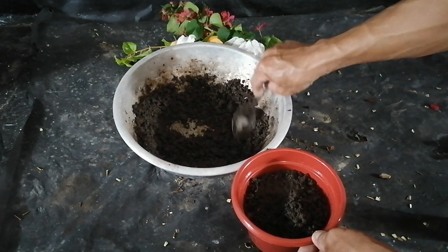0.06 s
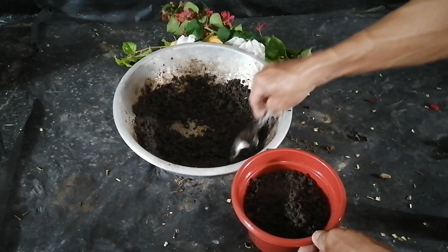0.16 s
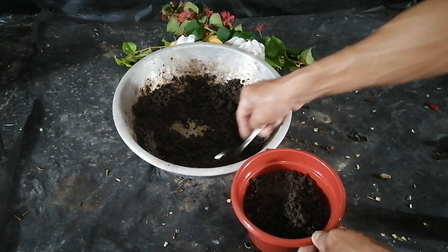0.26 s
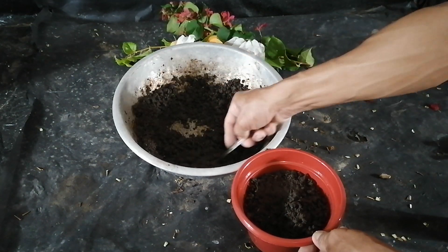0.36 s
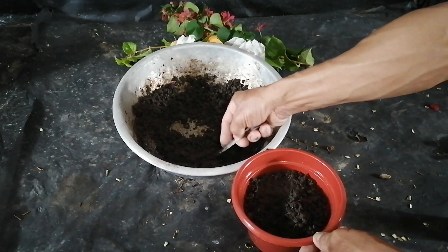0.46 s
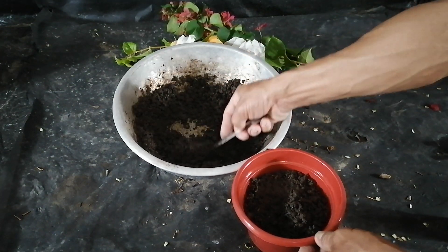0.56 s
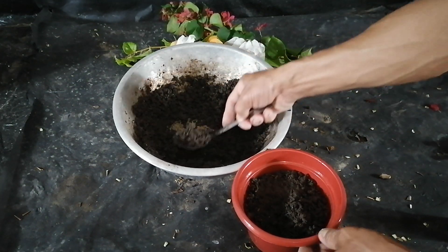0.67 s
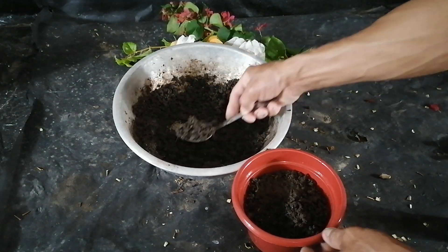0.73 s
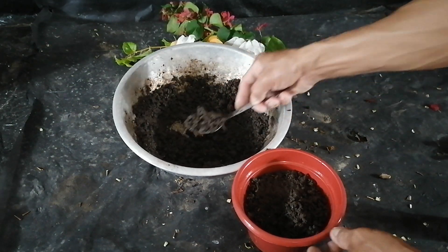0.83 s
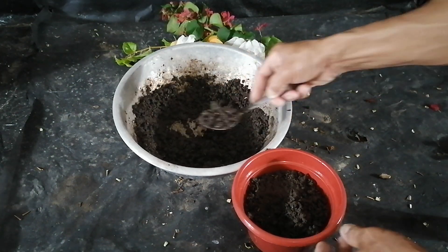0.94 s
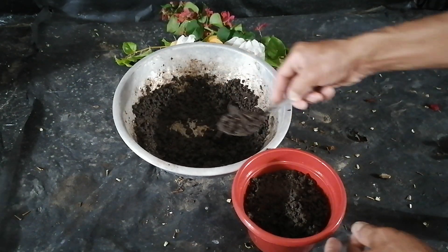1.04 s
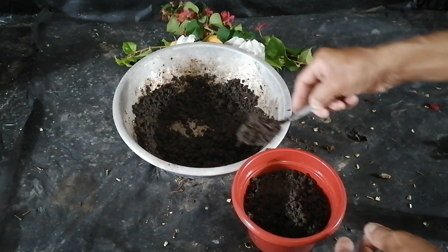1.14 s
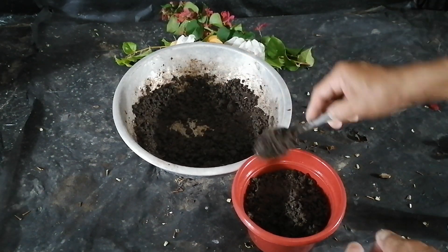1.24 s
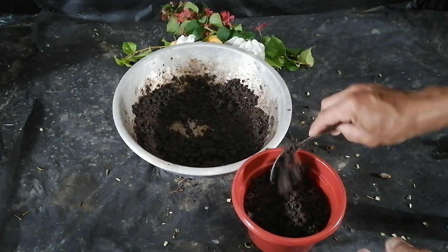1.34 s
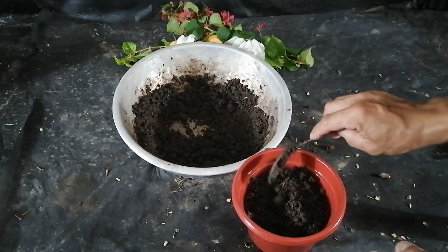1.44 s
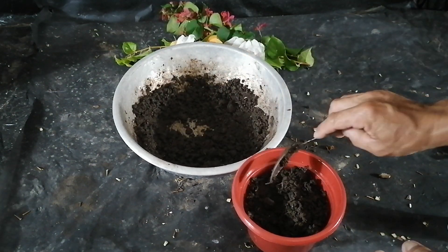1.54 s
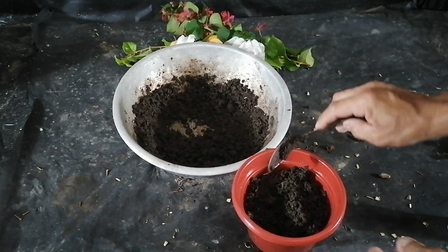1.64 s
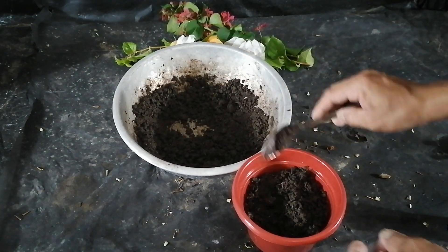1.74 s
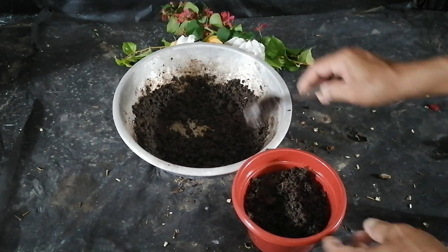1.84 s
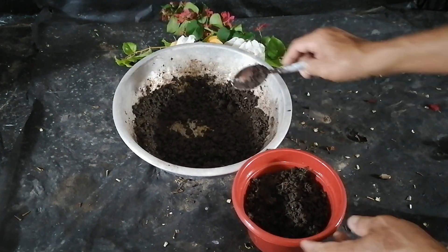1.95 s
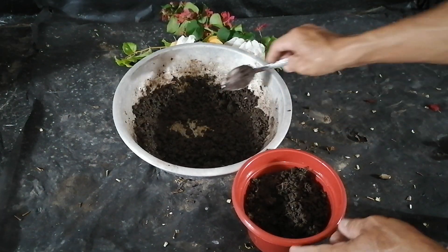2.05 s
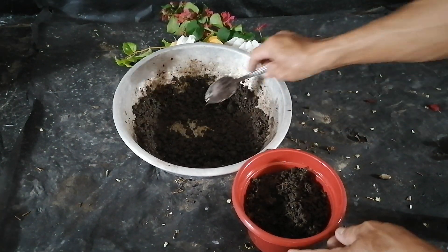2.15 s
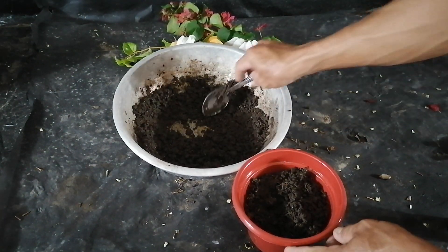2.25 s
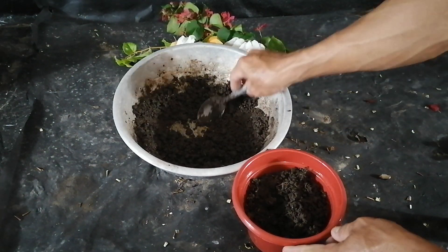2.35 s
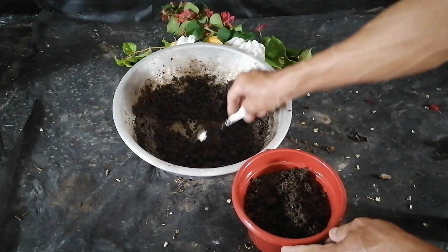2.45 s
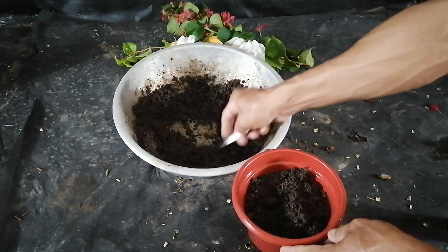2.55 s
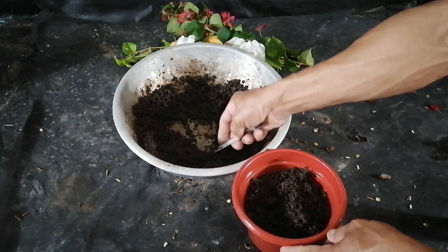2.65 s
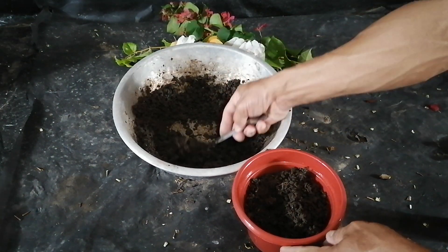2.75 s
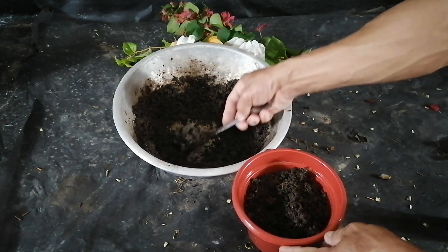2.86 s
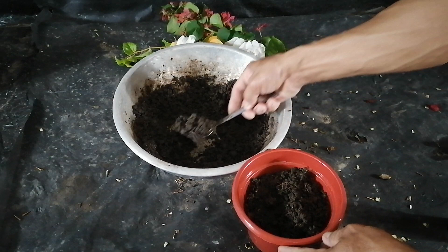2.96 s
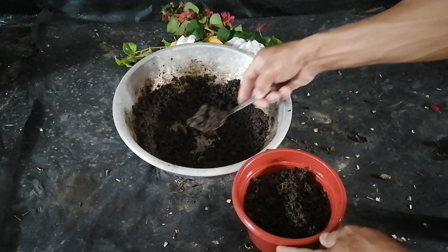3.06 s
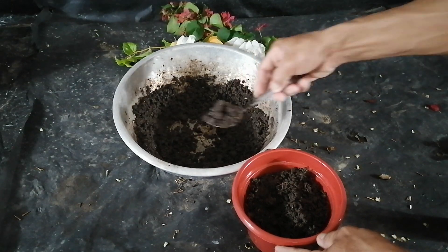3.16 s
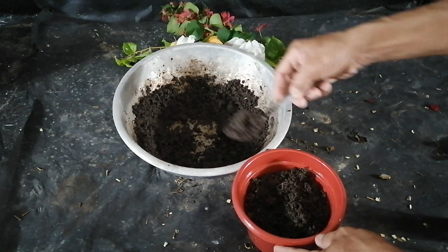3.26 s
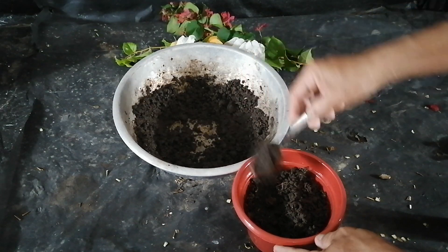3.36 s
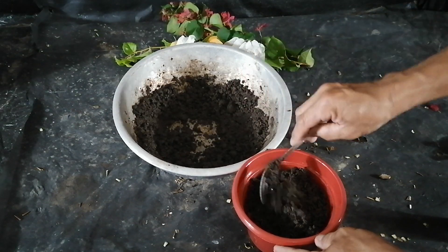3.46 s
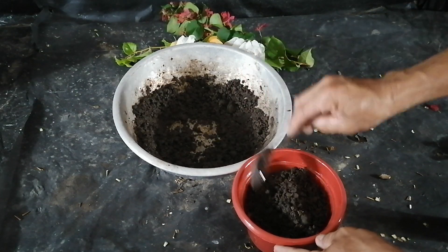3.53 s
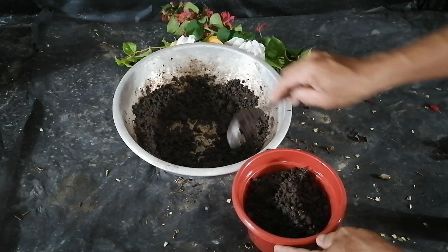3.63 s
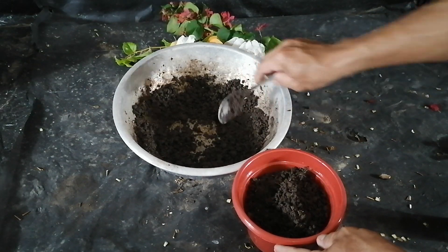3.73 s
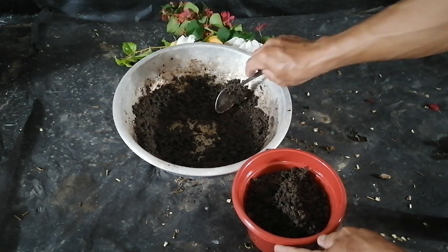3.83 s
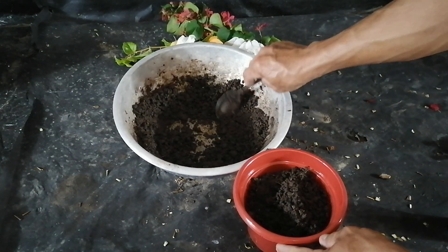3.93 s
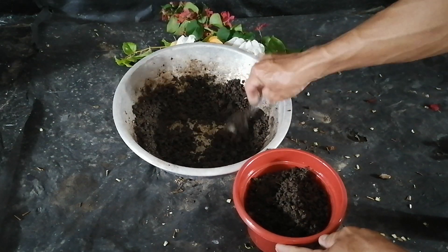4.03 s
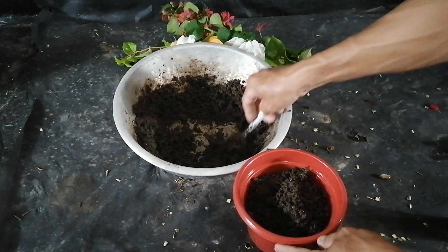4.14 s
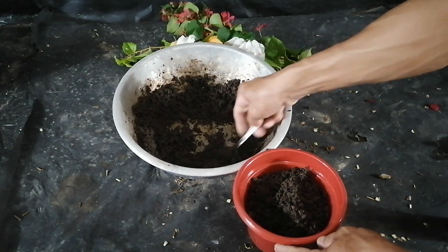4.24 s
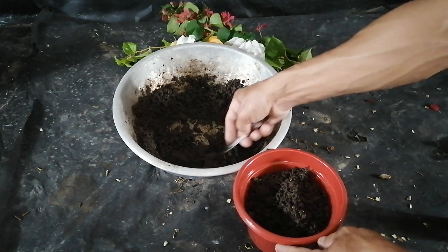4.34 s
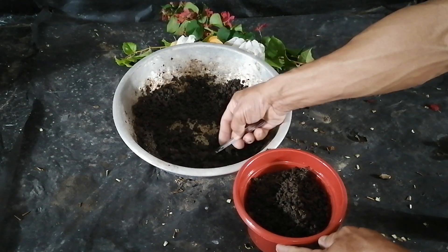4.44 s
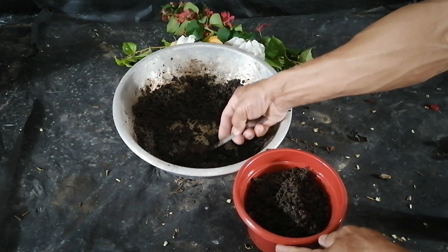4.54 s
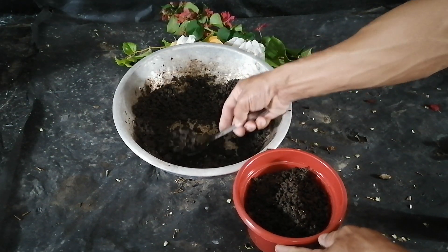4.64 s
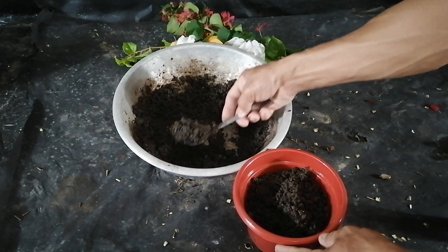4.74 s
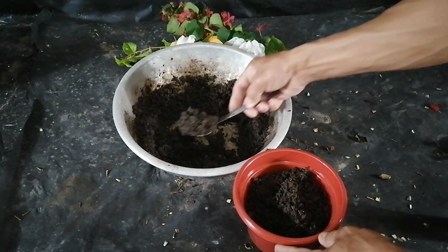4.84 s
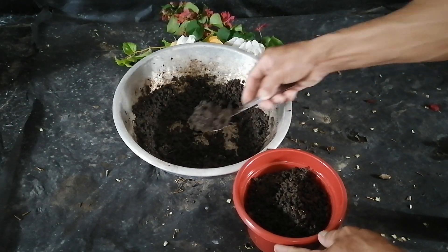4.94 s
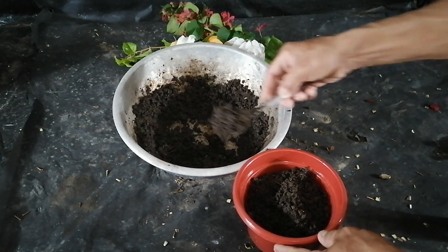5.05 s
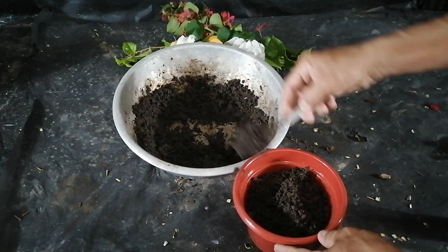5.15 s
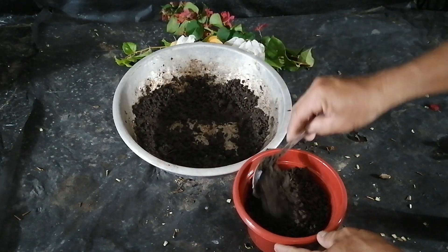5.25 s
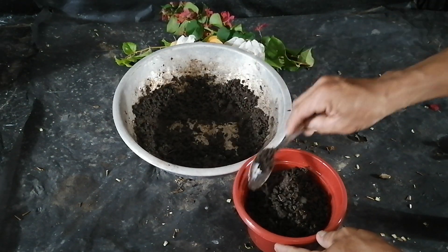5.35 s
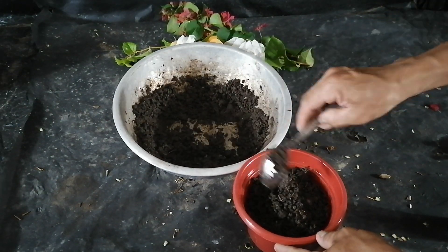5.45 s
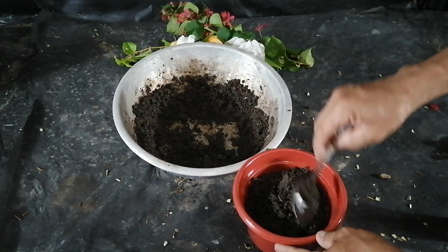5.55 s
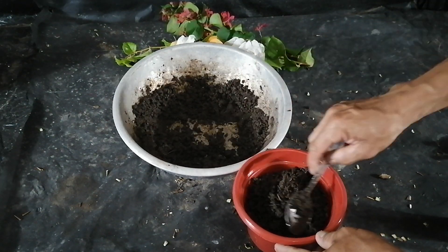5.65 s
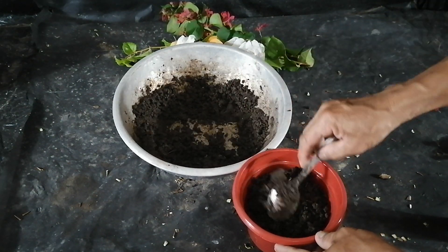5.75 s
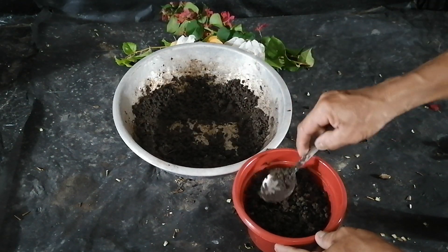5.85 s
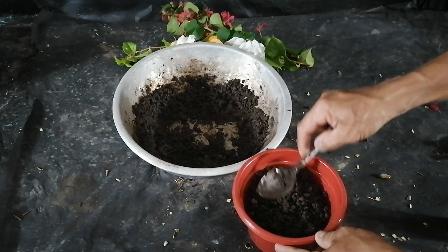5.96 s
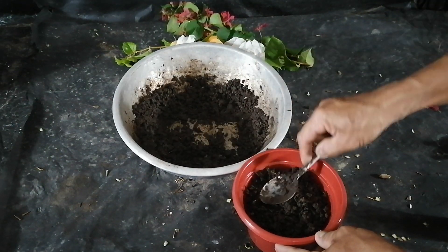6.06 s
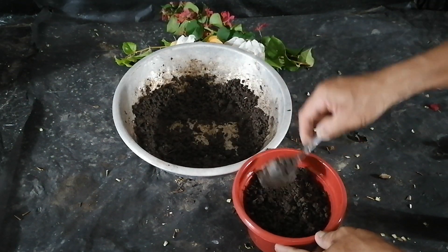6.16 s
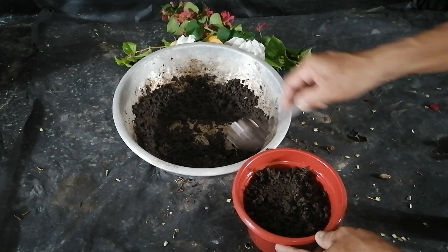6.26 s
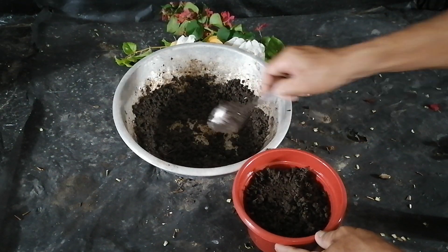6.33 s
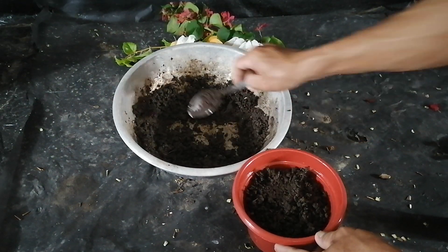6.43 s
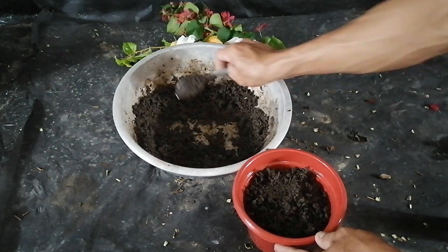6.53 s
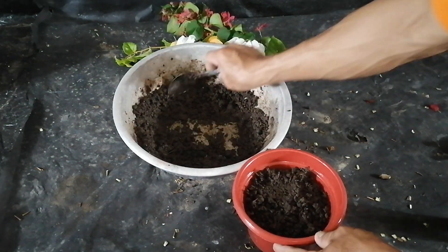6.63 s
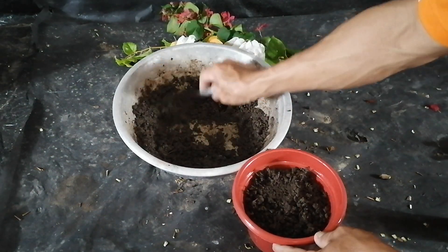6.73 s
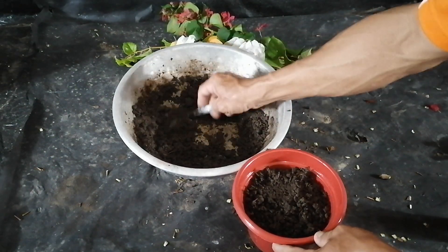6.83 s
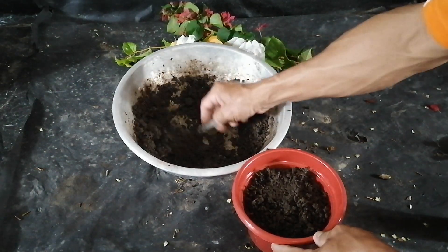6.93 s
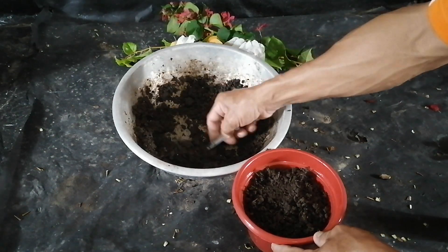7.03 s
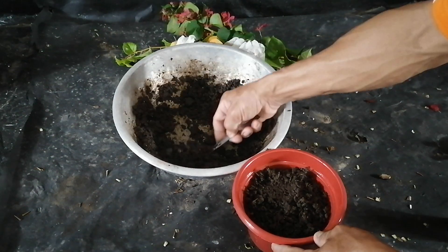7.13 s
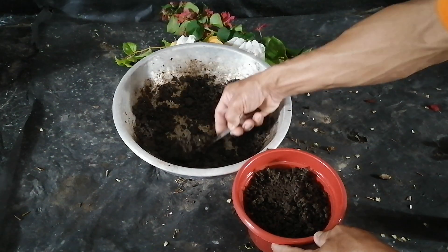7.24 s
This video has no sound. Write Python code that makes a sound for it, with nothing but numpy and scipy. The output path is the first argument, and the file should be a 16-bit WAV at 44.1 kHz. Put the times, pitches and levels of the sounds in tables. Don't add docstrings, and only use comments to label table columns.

```python
import sys
import numpy as np
from scipy import signal
from scipy.fft import rfft, irfft
from scipy.io import wavfile
from scipy.ndimage import uniform_filter1d

SR = 44100
rng = np.random.default_rng(int(sys.argv[2]) if len(sys.argv) > 2 else 0)


def linear_from_db(decibels):
    return 10 ** (np.asarray(decibels, float) / 20)


def waveform_to_disk(signal):
    frames = np.transpose(np.atleast_2d(signal))
    scaled = np.clip(frames, -1, 1) * 32767
    samples = np.round(scaled).astype(np.int16)
    wavfile.write(sys.argv[1], SR, samples)


N = 321489

# start, strongest moment and end in seconds, level in dB,
# brightness in dB.
SCRAPES = [
    (0.269, 0.422, .66, -40.5, 0),
    (2.698, 2.714, 2.92, -44, -2),
    (4.288, 4.384, 4.594, -43.5, -0.5),
    (4.38, 4.458, 4.655, -53.5, 6.5),
    (6.713, 6.821, 6.85, -60, 11),
    (6.82, 6.851, 6.9, -61, 18),
    (7.107, 7.135, 7.3, -45.5, 3),
]


def rms_one(x):
    return x / np.sqrt(np.mean(x ** 2) + 1e-20)


def in_time(rows, column):
    rows = np.array(rows)
    return np.interp(np.arange(N) / SR, rows[:, 0], rows[:, column])


def gain_in_time(rows, column):
    return linear_from_db(in_time(rows, column))


def band(x, low_hz, high_hz, order=2):
    return signal.sosfilt(signal.butter(order, [low_hz, high_hz], "band", fs=SR, output="sos"), x)


def resonance(x, hz, width):
    r = np.exp(-np.pi * max(width, 3) / SR)
    feedback = [1, -2 * r * np.cos(2 * np.pi * hz / SR), r * r]
    return signal.lfilter([(1 - r * r) / 2, 0, (r * r - 1) / 2], feedback, x)


def drift(rate):
    r = np.exp(-2 * np.pi * rate / SR)
    slow = signal.lfilter([1], [1, -2 * r, r * r], rng.standard_normal(N + SR))
    return rms_one(slow[SR:])


def digging():
    # resonance in Hz, width in Hz, level in dB.
    floor_peaks = [(298, 70, -6), (421, 46, 3), (519, 22, -12), (555, 20, 7), (628, 72, 0)]
    wall_peaks = [(991, 77, 5), (1160, 177, 6.5), (1235, 7, -5), (1590, 42, -5.5)]
    soil_peaks = [(1950, 27, -5.5), (2590, 100, -5), (3090, 280, -4.5), (3267, 27, 2.5)]
    spoon_peaks = [(5300, 170, -8.5), (5520, 95, -1), (5750, 20, -8.5), (6580, 220, 8.5), (7220, 940, 6.5)]
    # low Hz, high Hz, resonances, ring dB, cycles of a grain, grains per s, size spread dB,
    # clumping dB, least force dB
    bodies = [(368.0, 720, floor_peaks, -1.5, 2.2, 1200, 1.4, 2.6, -81),
              (957, 1680, wall_peaks, 0, 4.5, 1800, 1.8, 0.6, -84.0),
              (1820, 3556, soil_peaks, -3.5, 12.0, 2800, 3.4, 0.81, -77),
              (4800, 7400, spoon_peaks, 0.0, 9.2, 4400, 1.18, 0.59, -70.5)]
    slips = drift(150)
    out = np.zeros(N)
    for k, row in enumerate(bodies):
        low_hz, high_hz, peaks, ring_db, sharpness, per_s, spread_db, clump_db, least_db = row
        clumps = rms_one(linear_from_db(clump_db * (slips + 0.7 * drift(40))))
        stroke = np.sqrt(np.maximum(stroke_power(k) - linear_from_db(2 * least_db), 0))
        sliding = stroke * clumps * grains(per_s, spread_db)
        knocking = np.sqrt(knock_power(k)) * rng.standard_normal(N)
        out += body(sliding + knocking + 1e-18, low_hz, high_hz, peaks, ring_db, sharpness)
    return out


def stroke_power(column):
    # start, strongest moment and end in seconds, level in dB, brightness in dB.
    pushes = [
        (0.106, 0.16, 0.54, -54, -4),
        (.2, .3, 0.27, -62, -2),
        (2.469, 2.53, 2.77, -47, -0.5),
        (2.603, 2.624, 2.725, -37.5, 5.5),
        (2.618, 2.664, 2.736, -37.5, 5.5),
        (3.986, 4.145, 4.32, -46, -1),
        (6.87, 6.896, 7.03, -42, 8),
        (6.91, 6.977, 7.16, -42, 4),
    ]
    pats = [
        (0.34, .345, 0.27, -55.5, -10),
        (3.04, 3.105, 3.26, -65.5, -1),
        (4.05, 4.083, 4.9, -62, 2),
        (6.728, 6.778, 7.1, -60.5, 1),
        (6.837, 6.84, 6.87, -47.5, 1),
        (7.14, 7.205, 7.33, -52.5, 0),
        (3.173, 3.21, 3.31, -57, -2.5),
        (5.264, 5.294, 5.44, -63, 1.5),
        (5.4, 5.474, 5.57, -59, 1),
    ]
    spills = [
        (0.697, 0.964, 1.01, -68, -2.8),
        (1.428, 1.5, 1.65, -72.5, -3),
        (1.498, 1.727, 1.9, -71, 1.7),
        (1.997, 2.09, 2.63, -75.5, 0.57),
    ]
    # level in dB, swell before the strongest moment
    # in dB, fade after it in dB, share of brightness.
    push = [(-5, -0.5, -3.5, 0), (21.5, 32, 26.5, 23.5), (20.5, 18.5, 22, 21), (1, 0, 1, 1)]
    scrape = [(0, -7.5, -10, 11.25), (40, 30, 36, 28), (32.8, 37, 53, 42.2), (0, 0.5, 0.9, 1)]
    pat = [(0, -4.5, -10, -8), (19.7, 13, 24, 15), (24.8, 19, 20, 10), (0, 0, 1, 1)]
    spill = [(0, -2, 1.1, 7.3), (8, 15.5, 5.5, 4.3), (16, 14, 15, 29), (0, 1, 2.2, 0.94)]
    linger = [
        (1.3, 1.48),
        (1.3, 1.64),
        (1.3, 1.22),
        (1.3, 1.6),
    ]
    out = np.zeros(N)
    for rows, drive, powers in zip((pushes, SCRAPES, pats, spills), (push, scrape, pat, spill), linger):
        level_db, swell_db, fade_db, share = drive
        swell, fade = powers
        for start, top, end, db, bright_db in rows:
            part = slice(round(start * SR), min(round(end * SR), N))
            t = np.arange(part.start, part.stop) / SR
            before = np.clip((top - t) / (top - start), 0, 1)
            after = np.clip((t - top) / (end - top), 0, 1)
            loss_db = swell_db[column] * before ** swell + fade_db[column] * after ** fade
            out[part] += linear_from_db(2 * (db + level_db[column] + share[column] * bright_db - loss_db))
    return out


def knock_power(column):
    # time in seconds, peak in dB, brightness in dB.
    jolts = [(0.274, -69, 28), (.313, -50.5, 25), (0.343, -47, 12), (.351, -42, 7), (0.378, -26, -1),
             (.423, -38.5, 9), (.468, -39, 15), (.489, -32, 7), (.508, -35, -12), (2.606, -34.5, -2),
             (2.707, -35, 11), (2.715, -37, 12), (2.728, -44, -6), (2.741, -30.5, 3.5), (2.757, -41, 15),
             (2.765, -38.5, 9), (2.774, -43.5, 9), (4.149, -46.5, 23), (4.35, -32, 3.5), (4.372, -24, 1),
             (4.4, -28.5, 8.5), (6.744, -62.5, 22), (6.833, -35.5, 16.5), (6.847, -44, 9),
             (6.968, -26.5, -2.5), (6.992, -32.5, 10), (7.125, -38, 4), (7.147, -38, 12),
             (7.159, -30.5, -7)]
    # time in seconds, peak in dB, brightness in dB, t60 in seconds.
    taps = [(.105, -55.5, -19, 0.05), (.135, -49, -19, 0.051), (1.477, -56, 3.5, 0.027),
            (1.54, -50.5, -6, .018), (2.491, -45, 1, 0.028), (2.511, -32.5, -3, .04),
            (2.517, -29.5, 1, 0.04), (2.617, -20.5, -5.5, .02), (2.631, -43, 11, .023),
            (3.087, -53.5, -10, 0.029), (3.186, -38, -23, 0.025), (3.254, -53, -9, .02),
            (3.631, -46, -3, 0.019), (4.109, -36, 1.5, 0.076), (4.124, -23.5, -0.5, 0.039),
            (4.139, -23.5, 3.5, 0.024), (5.262, -52, -7, 0.013), (5.46, -33.5, -16, 0.027),
            (5.494, -49, -9, 0.02), (5.798, -71, 10, .017), (5.866, -61, -5, 0.038),
            (5.993, -65, 11, 0.035), (6.129, -70, 10, 0.023), (6.879, -40.5, 17, 0.034),
            (6.833, -41.5, 8.5, 0.035), (6.983, -30, -5, 0.05), (7.127, -44.5, 11, 0.063),
            (7.039, -36.5, -16, 0.029)]
    # level in dB, share of brightness.
    jolt = [(0, -7.5, -14, 0.041), (0, 0.09, 0.7, 1)]
    tap = [(-6.5, 0.00069, 0, 0.042), (0.19, 0.0029, 0.92, 1)]
    jolt_t60_s = 0.026
    out = np.zeros(N)
    t = np.arange(SR // 8) / SR
    timed_jolts = [row + (jolt_t60_s,) for row in jolts]
    for rows, (level_db, share) in ((timed_jolts, jolt), (taps, tap)):
        for s, db, bright_db, t60 in rows:
            start = round(s * SR)
            peak_db = db - 2.0 + level_db[column] + share[column] * bright_db
            onset = np.minimum(t / 0.0016, 1)
            burst = linear_from_db(2 * (peak_db - 60 * t / max(t60, 0.004))) * onset
            out[start:start + len(t)] += burst[:N - start]
    return out


def grains(per_s, spread_db):
    sizes = linear_from_db(spread_db * np.minimum(rng.exponential(1, N), 5)) * rng.choice([-1, 1], N)
    return rms_one(sizes * (rng.random(N) < per_s / SR))


def body(force, low_hz, high_hz, peaks, ring_db, sharpness):
    pitches = np.geomspace(low_hz, high_hz, 7)
    dealt = rng.integers(0, 7, N)
    own = np.zeros(N)
    for k, hz in enumerate(pitches):
        own += resonance(force * (dealt == k), hz, hz / sharpness) * np.sqrt(sharpness * SR / hz)
    rings = np.zeros(N)
    for k, (hz, width, db) in enumerate(peaks):
        rings += (-1) ** k * linear_from_db(db) * resonance(force, hz, width)
    ringing = np.sqrt(SR / sum(linear_from_db(2 * db) * width for hz, width, db in peaks))
    return band(own + linear_from_db(ring_db) * ringing * rings, 0.85 * low_hz, 1.77 * high_hz) / 2


def singing():
    # start
    # and end in seconds, pitch in Hz, width in Hz, level in dB.
    held = [(0.15, .27, 1460, 400, -61.5), (0.15, 0.29, 3030, 250, -59), (0.16, .27, 5650, 300, -57),
            (0.384, .5, 2740, 405, -48.5), (1.69, 1.8, 5450, 300, -67), (.365, 0.488, 1090, 280, -47.5),
            (2.615, 2.68, 1140, 200, -32.5), (2.59, 2.7, 472, 200, -35.5), (2, 2.2, 1750, 500, -76.5),
            (4.596, 4.717, 1630, 400, -75.5), (7.127, 7.1, 2700, 900, -49.5), (4.045, 4.12, 5200, 250, -50),
            (4.37, 4.495, 2800, 296, -49.5), (5.458, 5.58, 710, 380, -59.5), (7.4, 6.827, 5100, 400, -56),
            (6.855, 7.13, 230, 90, -55.5), (7, 7.1, 785, 200, -47.5), (.23, .36, 5300, 300, -52),
            (1.66, 1.78, 300, 150, -61), (2.615, 2.7, 310, 60, -45)]
    floor_hz, floor_width_hz, floor_db = 757, 190, -12.5
    floor = [(top - 0.05, end - 0.04, floor_hz, floor_width_hz, db + floor_db) for _, top, end, db, _ in SCRAPES]
    out = np.zeros(N)
    grit = grains(2900, 1.1)
    for start, end, hz, width, db in held + floor:
        part = slice(round(start * SR), round(end * SR))
        tone = rms_one(resonance(resonance(grit[part], hz, width), hz, width))
        out[part] += linear_from_db(db) * tone * np.sqrt(np.hanning(len(tone)))
    return out


def pings():
    # time in seconds, peak in dB, pitch in Hz, t60 in seconds.
    clear_notes = [(1.48, -55, 1500, 0.017), (1.603, -41.5, 390, 0.022), (2.4907, -39.5, 3450, .027),
                   (2.5135, -30.5, 1160, 0.056), (2.6234, -31, 1140, .069), (2.7043, -15, 6980, 0.014),
                   (2.7317, -26, 5200, .011), (2.9442, -27, 5260, 0.007), (3.6331, -49, 1130, .011),
                   (4.1268, -22, 2590, 0.033), (4.14, -25.5, 2510, .027), (5.262, -40, 1484, 0.018),
                   (5.2744, -53.5, 1520, .046), (5.461, -18.5, 1890, 0.0093), (5.462, -26.5, 790, 0.015),
                   (5.463, -39.5, 336, .03), (6.835, -37, 786, 0.021), (6.8418, -15, 5400, 0.01)]
    out = np.zeros(N)
    t = np.arange(SR // 10) / SR
    for s, db, hz, t60 in clear_notes:
        start = round(s * SR)
        decay = linear_from_db(db - 1.0 - 60 * t / t60)
        onset = 1 - np.exp(-t / 0.00049)
        out[start:start + len(t)] += decay * onset * np.sin(2 * np.pi * hz * t)
    return out


def yard(x):
    t = np.arange(SR // 3) / SR
    tail = band(rng.standard_normal(len(t)), 280, 3000) * linear_from_db(-60 * t / 0.18) * (t > 0.006)
    return signal.fftconvolve(x, tail / np.sqrt(np.sum(tail ** 2)))[:N]


def gust():
    # time in seconds, level in dB.
    puffs = [
        (1.56, -66),
        (1.65, -67),
        (1.684, -51.5),
        (1.734, -52.5),
        (1.85, -84),
        (1.86, -82),
    ]
    t = np.arange(N) / SR
    puff = gain_in_time(puffs, 1) * (t > puffs[0][0]) * (t < puffs[-1][0])
    noise = rng.standard_normal(N)
    return puff * rms_one(band(noise, 56, 354) + resonance(noise, 120, 40))


def narrow_noise(peaks, flicker_db, flicker_rate):
    out = np.zeros(N)
    for hz, width, db in peaks:
        tone = resonance(resonance(rng.standard_normal(N), hz, width), hz, width)
        out += linear_from_db(db + flicker_db * drift(flicker_rate)) * rms_one(tone)
    return out


def motor():
    # time in seconds, level in dB.
    hum_level = [(0.0, -67.5), (0.3, -67.5), (0.38, -90), (0.77, -62), (1.2, -78.5), (1.72, -64),
                 (2.05, -75), (3.98, -69), (4.53, -80.5), (4.63, -69), (5.38, -70), (5.66, -76),
                 (6.72, -68.5), (6.88, -78), (7.25, -80), (7.29, -97)]
    # tone in Hz, width in Hz, level in dB.
    hum = [(57.4, 25, -1), (114, 11, -9)]
    # time in seconds, level in dB.
    surges = [
        (.16, -65),
        (.79, -69),
        (2.15, -61.5),
        (3.98, -69),
        (6.7, -66),
    ]
    surge_s, surge_hz = 0.078, 131.3
    t = np.arange(N) / SR
    labour = sum(linear_from_db(db) * np.exp(-((t - s) / surge_s) ** 2) for s, db in surges)
    steady = gain_in_time(hum_level, 1) * narrow_noise(hum, 0.42, 2.1)
    return steady + labour * narrow_noise([(surge_hz, 40, -5)], 0.32, 2.0)


def insects():
    # centre in Hz, width in Hz, level in dB.
    chorus = [(2355, 300, -71), (2606, 390, -74.5), (2890, 140, -78.5), (4836, 92, -79), (6670, 67, -76),
              (6550, 100, -70.5), (6760, 1100, -65.5), (5400, 810, -80)]
    return narrow_noise(chorus, 0.93, 12)


def air():
    # frequency in Hz, level in dB per Hz.
    spectrum = [(12, -29), (20, 12), (70, -6.5), (168, -2.5), (1690, -21), (2460, -14), (3770, -25),
                (4380, -21), (4730, -23.5), (5780, -22), (6710, -11), (7240, 3), (8000, -15.5),
                (10400, -68), (17600, -120)]
    corner_hz, corner_db = np.transpose(spectrum)
    hz = np.maximum(np.arange(N // 2 + 1) * SR / N, 10)
    shape = linear_from_db(np.interp(np.log(hz), np.log(corner_hz), corner_db))
    shape[hz < 26] *= 0.3
    noise = rms_one(irfft(rfft(rng.standard_normal(N)) * shape, N))
    return linear_from_db(-62 + 0.34 * drift(0.5)) * noise


def ducking(near, knee_db, most_db):
    power = uniform_filter1d(near ** 2, size=SR // 12)
    return linear_from_db(-most_db * power / (power + linear_from_db(2 * knee_db)))


def scene():
    near = digging() + singing() + pings()
    background = (insects() + air()) * ducking(near, knee_db=-43.5, most_db=3)
    far = background + motor() * linear_from_db(2.0)
    return (near + linear_from_db(-13) * yard(near) + far + gust())[None]


def top_cut(x):
    return signal.sosfilt(signal.butter(12, 8420, fs=SR, output="sos"), x)


def record(dry):
    rounded = 0.23 * np.tanh(dry / 0.25)
    cut = signal.sosfilt(signal.cheby2(16, 90, 8505, fs=SR, output="sos"), rounded)
    hiss = linear_from_db(-102) * rng.standard_normal(dry.shape)
    return top_cut(cut + hiss)


dry = scene()
out = record(dry)
waveform_to_disk(out)
```